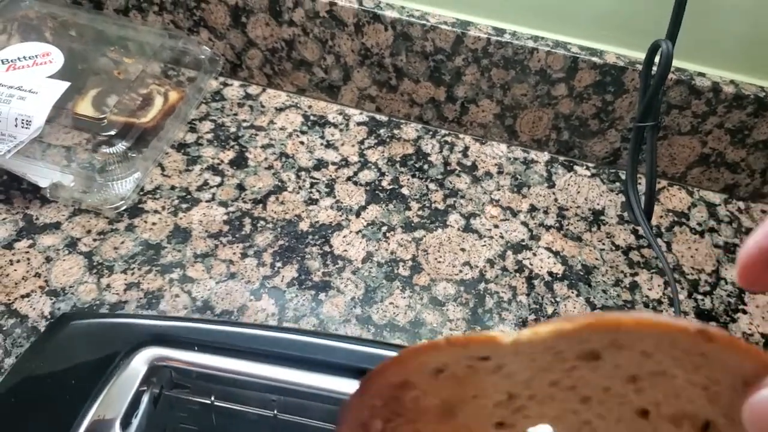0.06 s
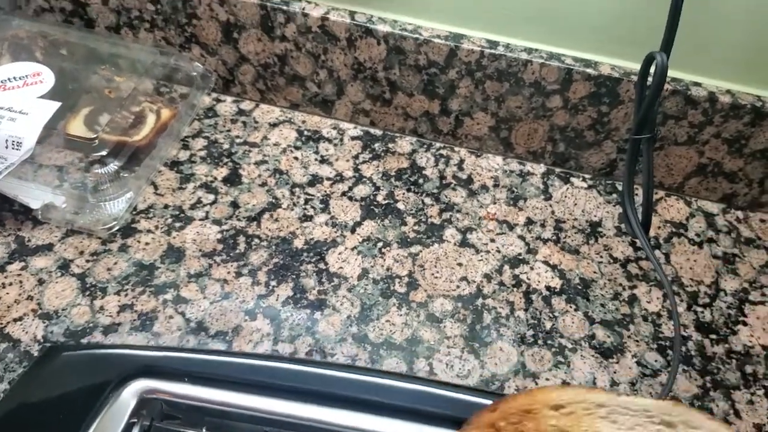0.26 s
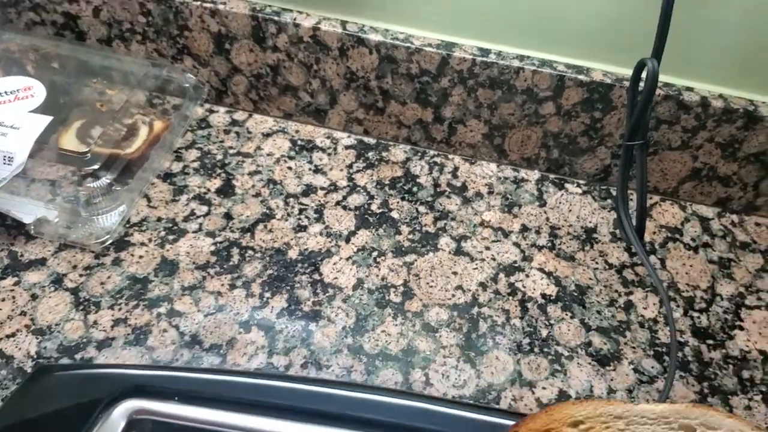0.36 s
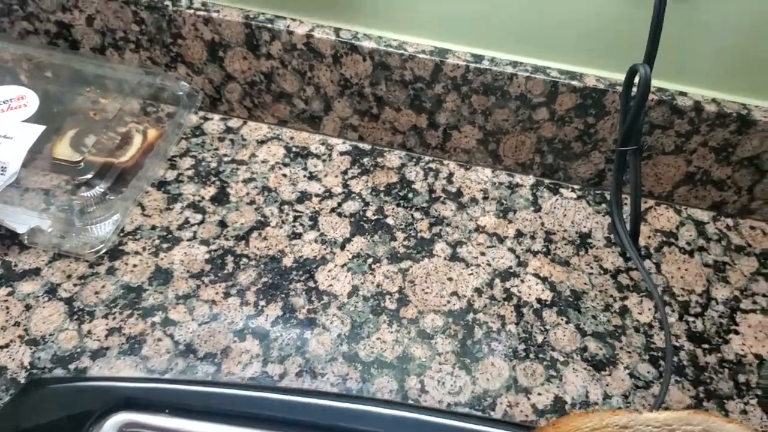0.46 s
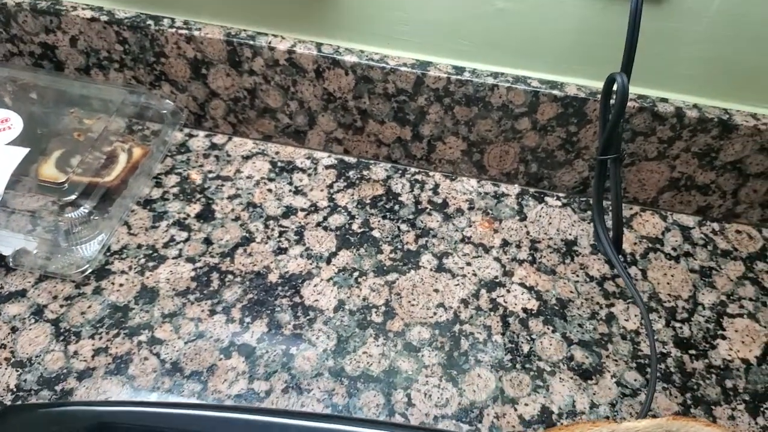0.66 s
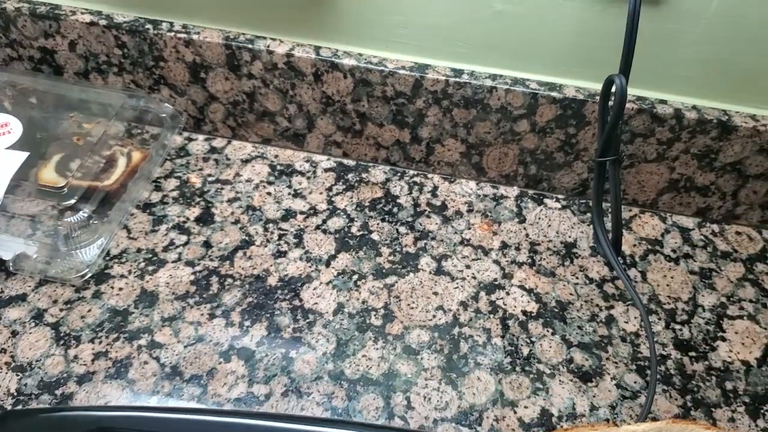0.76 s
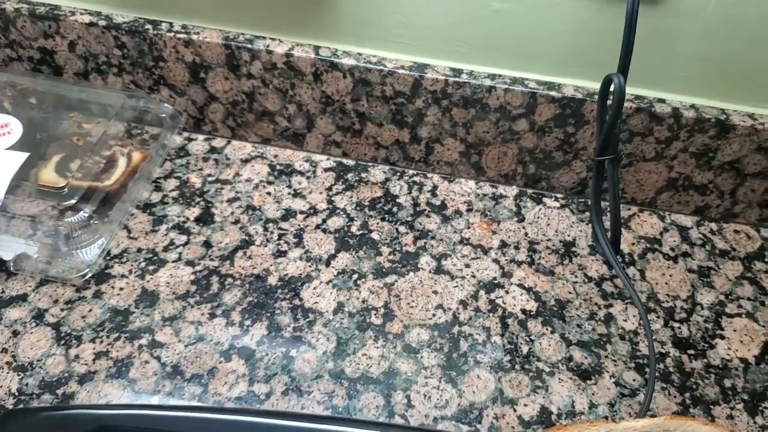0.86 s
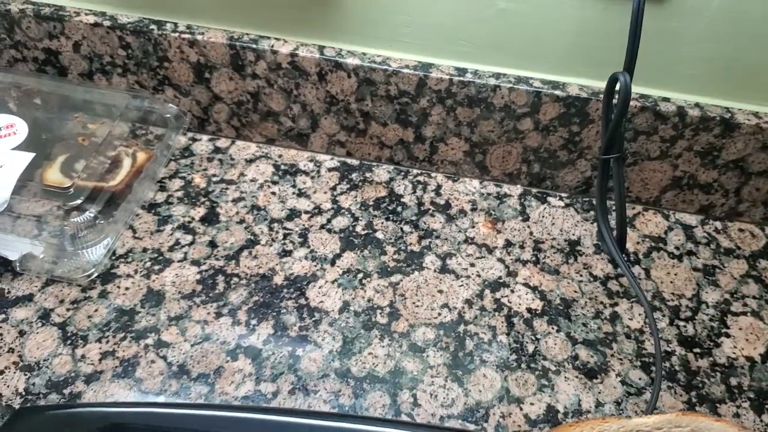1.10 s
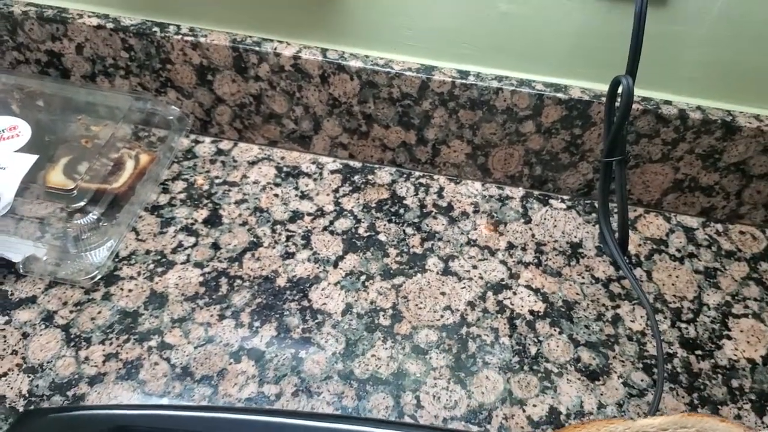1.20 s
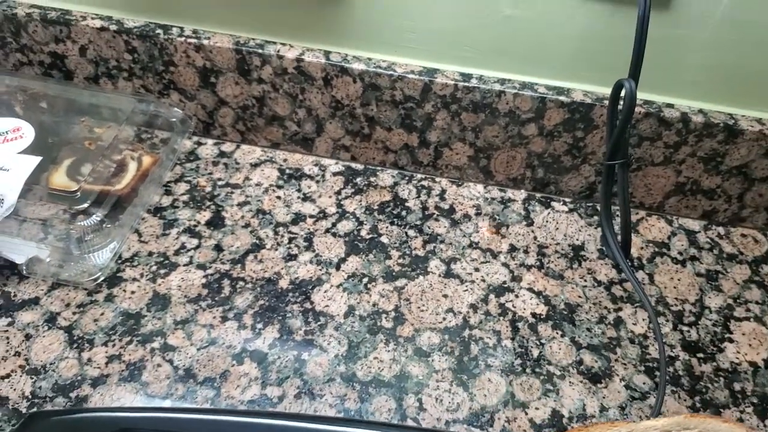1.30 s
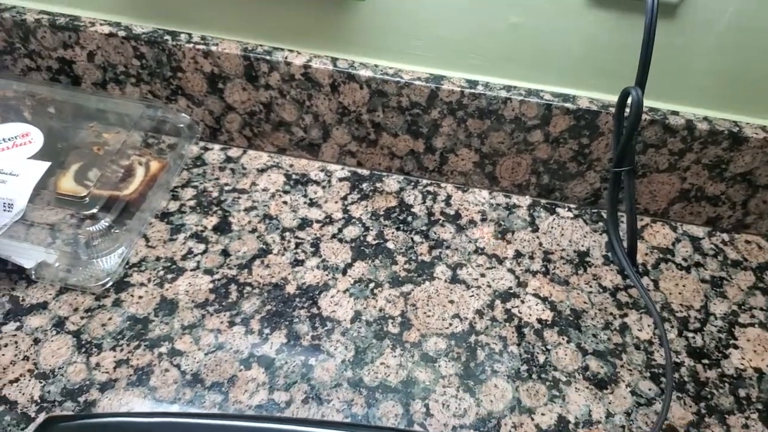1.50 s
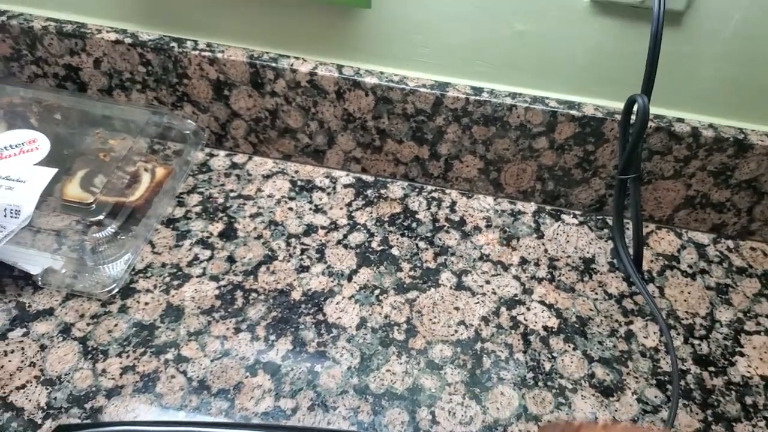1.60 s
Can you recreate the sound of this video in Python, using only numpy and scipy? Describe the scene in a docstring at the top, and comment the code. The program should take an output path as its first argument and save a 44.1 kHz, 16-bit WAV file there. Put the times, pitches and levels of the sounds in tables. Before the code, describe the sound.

On a kitchen counter, a toaster lever clunks down and rattles after a light scrape of bread. Small ticks follow as it settles, then a faint low hum and a few soft bumps near the microphone.

```python
"""A toaster on a stone kitchen counter: bread scrapes along its wire guards and the lever is pushed down.
The carriage knocks, hits its stop and rattles. Each impact excites damped normal modes, low in the case
and high in the guards, and the toaster rocks on its rubber feet. The spring and catch tick as they settle.
After a pause with a low hum come soft handling bumps close to the microphone."""
import sys
import numpy as np
from scipy import signal
from scipy.io import wavfile

SR = 44100
rng = np.random.default_rng(int(sys.argv[2]) if len(sys.argv) > 2 else 0)


def wav_out(sig):
    """Save sig, one row per channel (or a flat mono array), as 16-bit PCM at SR to the path in sys.argv[1]."""
    wavfile.write(sys.argv[1], SR, np.round(np.clip(np.atleast_2d(sig).T, -1, 1) * 32767).astype(np.int16))


N = 72765
TIME = np.arange(N) / SR
EDGES_HZ = 31.25 * 2 ** (np.arange(28) / 3)  # third-octave bands
CENTRES_HZ = np.sqrt(EDGES_HZ[1:] * EDGES_HZ[:-1])


def from_db(db):
    """Amplitude grows tenfold every 20 dB."""
    return 10 ** (np.asarray(db) / 20)


def rms_one(x):
    """Normalisation to unit mean power."""
    return x / np.sqrt(np.mean(x ** 2) + 1e-20)


def by_band(points):
    """Interpolation over log frequency, read at the band centres."""
    hz, value = np.transpose(points)
    return np.interp(np.log(CENTRES_HZ), np.log(hz), value)


def colour(spectrum):
    """Band power is spectral density times bandwidth; the gains have unit total power."""
    gain = from_db(by_band(spectrum)) * np.sqrt(np.diff(EDGES_HZ))
    return gain / np.linalg.norm(gain)


def noise_bands():
    """Partial coherence: bands of stereo noise, more alike in the bass than in the treble."""
    # likeness of left and right: frequency_hz, correlation
    coherence = [(60, 0.571), (300, 0.69), (700, 0.43), (1500, 0.2904), (14000, 0.43)]
    white, bands = rng.standard_normal((2, 2, N)), []
    for k, alike in enumerate(np.clip(by_band(coherence), 0, 1)):
        bandpass = signal.butter(2, EDGES_HZ[k:k + 2], "band", fs=SR, output="sos")
        mid, side = signal.sosfilt(bandpass, white[k % 2])
        bands.append(rms_one(np.sqrt(1 + alike) * mid + np.sqrt(1 - alike) * side * [[1], [-1]]))
    return np.array(bands)


def response(crack_t60_s, room_db, snap_db, snap_t60_s=0.00406):
    """Impulse response of a contact by band: a snap, a crack of dense modes and reverberation."""
    # reverberation time of the kitchen: frequency_hz, t60_s
    room_decay = [(60, 1), (300, 0.77), (1000, 0.45), (3000, 0.535), (8000, 0.4345), (15000, 0.392)]
    tail = from_db(room_db - 60 * TIME / by_band(room_decay)[:, None])
    direct = np.hypot(from_db(snap_db - 60 * TIME / snap_t60_s), from_db(-60 * TIME / crack_t60_s))
    return noise_bands() * np.hypot(direct, tail)[:, None]


def mix(gains, bands):
    """Weighted superposition of bands."""
    return np.tensordot(gains, bands, 1)


def at(start_s, x):
    """A pure delay in whole samples."""
    return np.pad(x, ((0, 0), (int(start_s * SR), 0)))[:, :N]


def strikes(rows, spectrum, bands):
    """Impacts share an impulse response, each with its own strength and spectral tilt."""
    octaves = np.log2(CENTRES_HZ / 2500)
    return sum(at(s, mix(colour(spectrum) * from_db(db + tilt * octaves), bands)) for s, db, tilt in rows)


def ring(force, hz, t60_s):
    """A damped oscillator: a unit impulse starts a decaying sine of height 1."""
    radius, angle = np.exp(-np.log(1000) / (t60_s * SR)), 2 * np.pi * hz / SR
    return signal.lfilter([0, np.sin(angle)], [1, -2 * radius * np.cos(angle), radius ** 2], force + 1e-18)


def modes(start_s, level_db, table, spread_db=2.5):
    """Modal superposition: every blow excites every mode with a slightly different strength."""
    sound = 0
    for k, (hz, db, t60_s) in enumerate(table):
        scatter_db = spread_db * rng.standard_normal(len(start_s))
        force = np.zeros(N)
        force[(start_s * SR).astype(int)] = from_db(level_db + db + scatter_db)
        sound = sound + (-1) ** k * ring(force, hz, t60_s)
    return sound


def resonate(x, table):
    """Resonance lifts narrow bands: band-passed copies add to the sound."""
    return x + sum(from_db(db) * signal.lfilter(*signal.iirpeak(hz, hz / width_hz, fs=SR), x)
                   for hz, width_hz, db in table)


def grains(per_s, spread_db):
    """A Poisson train of impulses of uneven size and sign."""
    hits = rng.random(N) < per_s / SR
    sizes = from_db(spread_db * np.clip(rng.standard_normal(N), -2, 2))
    return hits * sizes * rng.choice([-1, 1], N)


def envelope(curve):
    """Amplitude envelope along a level curve, silent before it and from 20 ms after it."""
    time_s, db = np.transpose(curve)
    return from_db(np.interp(TIME, time_s, db)) * (TIME >= time_s[0]) * (TIME <= time_s[-1] + .02)


def background():
    """Narrow-band noise wavers in amplitude: a low room hum over faint hiss."""
    # partials of the hum: pitch_hz, level_db, width_hz
    partials = [(57.4, -76.5, 3.3), (104.6, -69.5, 7), (237.3, -88, 7.205), (431.94, -88, 8.7),
                (1385, -101, 9.5)]
    # swell of the hum: time_s, gain_db
    swell = [(0, 0.5), (.5, -28), (.7, 1.5), (.85, 2), (.94, -5), (1.02, 4), (1.09, -1.5), (1.16, -1.5),
             (1.24, -10.5), (1.65, 6)]
    # spectrum of the hiss: frequency_hz, density_db
    hiss = [(30, -11), (60, -4.5), (105, -6.5), (150, -18), (250, -17.5), (400, -20.5), (600, -28.5),
            (1300, -27.5), (2500, -30), (5000, -33), (8000, -45), (11000, -34.5), (15500, -34)]
    hum = 0
    for hz, db, width_hz in partials:
        tone = ring(rng.standard_normal(2 * N), hz, t60_s=np.log(1000) / (np.pi * width_hz))
        hum = hum + from_db(db) * rms_one(tone[N:])  # steady state only
    return envelope(swell) * hum + from_db(-73.5) * mix(colour(hiss), noise_bands())


def bread():
    """Sliding friction: crust grains scratch the wire guards, make them sing and squeak briefly."""
    # strength of the scrape: time_s, level_db
    scrape = [(0, -51.5), (.03, -59), (.075, -65), (.1, -65), (.125, -67), (.145, -65.5), (.19, -73),
              (.25, -55.5)]
    # spectrum of a crust grain: frequency_hz, density_db
    crust = [(35, -9.5), (60, 20.5), (130, 3), (300, 4.5), (450, 8), (650, -6), (1200, -1.5), (1600, -2),
             (2500, 0.5), (4200, -1), (5600, -11.5), (7300, -7.5), (8300, -7.5), (14000, -15)]
    # crust slipping on a wire: centre_s, level_db
    slips = [(0.018, -69), (0.101, -68), (0.145, -66.5)]
    grain = mix(colour(crust), response(crack_t60_s=0.01264, room_db=-13.5, snap_db=0.5))
    scratch = signal.fftconvolve(grains(per_s=2500, spread_db=6.5)[None], grain, axes=1)[:, :N]
    guards_hz, slip_half_s = [1154, 2014.5, 2385, 2883, 3303, 3710], 0.0102
    wires = np.array([sum(ring(grains(per_s=1500, spread_db=2), hz, t60_s=0.0867) for hz in guards_hz)
                      for _ in range(2)])
    slipping = sum(from_db(db) * np.exp(-((TIME - s) / slip_half_s) ** 2) for s, db in slips)
    squeaks = slipping * rms_one(ring(rng.standard_normal((2, N)), hz=7249, t60_s=0.0296))
    return envelope(scrape) * (rms_one(scratch) + from_db(-5.5) * rms_one(wires)) + squeaks


def lever():
    """Impact excitation: the carriage clacks and rattles, ringing the metal and the case."""
    # knocks of the carriage: start_s, boom_db, clack_db, tilt_db_per_octave, panel_hz
    knocks = [(0.1934, -48.5, -57, 2.5, 352.5), (0.2032, -39.5, -58.5, 0.5, 353.3),
              (0.217, -50, -54, -4, 324), (0.2483, -36.5, -28.5, -1, 260.2),
              (0.2615, -46, -43.5, -1.5, 284), (0.2878, -32.5, -38, 1, 475), (0.3118, -47, -50, 7, 345),
              (0.3413, -34.5, -37.5, 2.5, 434.6), (0.3556, -45, -43, 0.5, 313),
              (0.389, -39.5, -60.5, -6.5, 340), (0.42, -50.5, -78.5, -9.5, 414.4),
              (0.461, -57.5, -63.5, -1, 405), (0.531, -56, -57.5, -0.5, 403.8)]
    # spectrum of a clack: frequency_hz, density_db
    clack = [(40, -18.5), (75, 2.5), (130, -21.5), (190, -2.5), (450, 3.5), (570, -8.5), (800, -3),
             (1400, -0.5), (2800, -4), (4400, -6.5), (6200, -15.5), (10000, -15), (15500, -18)]
    # modes of the wire guards and sheet metal: pitch_hz, gain_db, t60_s
    metal_modes = [(703.4, 2, 0.19), (788.9, 3.5, 0.19), (870.1, 0, 0.21), (1152, -8.5, 0.83),
                   (1218, -4.5, 0.422), (1315, 7.5, 0.121), (1519.4, -16, 0.807), (1912.6, -2.5, 0.384),
                   (2213, -14, 0.85), (2420, -1, 0.23), (3416, -9.5, .33), (3806, -13.5, 1),
                   (4068, -1, 0.11), (5245, -4, 0.2)]
    # resonances of the carriage: centre_hz, width_hz, gain_db
    carriage = [(784.6, 99, 2), (1281.7, 28, 2.5), (4210, 250, -7.5), (5041, 120, -4), (13760, 860, -8)]
    start_s, boom_db, clack_db, tilt, panel_hz = np.transpose(knocks)
    blows = list(zip(start_s, clack_db, tilt))
    clacks = sum(strikes(blows[k::2], clack, response(crack_t60_s=0.0652, room_db=-8.5, snap_db=-3))
                 for k in range(2))  # two noise draws lower the stereo coherence
    metal = np.array([modes(start_s + rng.uniform(0, .001, len(start_s)), clack_db - 14, metal_modes)
                      for _ in range(2)])
    return resonate(clacks + rattle(clack), carriage) + metal + case(start_s, boom_db, panel_hz)


def case(start_s, boom_db, panel_hz, panel_boost_db=9.5, width_octaves=0.218):
    """Modal coupling: a knock booms in the whole case, most near the pitch of the panel it strikes."""
    # modes of the case on its feet: pitch_hz, gain_db, t60_s
    case_modes = [(85.93, -17, 0.565), (103.4, -8, 0.52), (115.5, 2, 0.326), (150.78, -13, 0.257),
                  (226.76, -18, .22), (277.57, -15.5, .33), (302.64, -15.5, 0.466), (349.77, -10, 0.221),
                  (382.4, -19, 0.17), (438.1, -10, 0.259), (479.43, -11.5, 0.1814)]
    boom = 0
    for k, (hz, db, t60_s) in enumerate(case_modes):
        coupling = np.exp(-(np.log2(hz / panel_hz) / width_octaves) ** 2)
        boom = boom + (-1) ** k * modes(start_s, boom_db + panel_boost_db * coupling, [(hz, db, t60_s)])
    return boom


def rocking():
    """A mass on a spring: each jolt sets the toaster swaying on its rubber feet."""
    # jolts to the toaster: start_s, level_db
    jolts = [(0.2033, -45.5), (0.2576, -38.5), (0.2941, -41.5)]
    start_s, db = np.transpose(jolts)
    force = np.zeros(N)
    force[(start_s * SR).astype(int)] = from_db(db)
    return ring(force, hz=57.18, t60_s=0.755)


def rattle(spectrum, start_s=.25, end_s=0.41, fall_db_per_s=93):
    """Random collisions of loose parts die away exponentially."""
    fading = from_db(-36.5 - fall_db_per_s * (TIME - start_s)) * (TIME > start_s) * (TIME < end_s)
    clicks = [mix(colour(spectrum), response(crack_t60_s=0.034, room_db=-27, snap_db=-5.5))
              for _ in range(2)]
    return sum(signal.fftconvolve((fading * grains(per_s=85, spread_db=3))[None], click, axes=1)[:, :N]
               for click in clicks)


def catch():
    """Light impacts tick through the spring's resonances; the catch pings in free vibration."""
    # the spring and catch settling: start_s, level_db, tilt_db_per_octave
    contacts = [(0.4538, -64, 10.5), (0.4768, -55, 7), (0.507, -67.5, 10), (0.545, -64.5, -4),
                (0.7139, -52.5, 2.5), (0.7255, -59.5, 2)]
    # spectrum of a tick: frequency_hz, density_db
    tick = [(60, -6), (400, 16.5), (600, -28), (790, 29), (1050, -32), (2000, 4), (2900, 4), (3700, -3),
            (5800, -4), (9000, -12), (15500, -13)]
    # resonances of the spring: centre_hz, width_hz, gain_db
    spring = [(8670, 170, 1), (12160, 1140, 1.5)]
    # modes of the catch: pitch_hz, level_db, t60_s
    catch_modes = [(412, -66.5, 0.746), (761.1, -70.5, 0.185), (788.8, -67, 0.13), (2520, -73, .15),
                   (2842, -64, 0.1)]
    ticks = strikes(contacts, tick, response(crack_t60_s=0.078, room_db=-15, snap_db=-6))
    ping = modes(start_s=np.array([0.7145]), level_db=0, table=catch_modes)
    return resonate(ticks, spring) + ping


def bump_colour(centre_hz, rise_db_per_octave=3, fall_db_per_octave=17):
    """A soft contact acts as a low-pass filter, leaving only a faint edge far above its centre."""
    # spectrum common to the bumps: frequency_hz, density_db
    bump = [(40, -9.5), (150, -6), (190, -7.5), (260, 7), (440, 0), (560, -8), (720, -5.5), (1300, 1),
            (2500, 3), (6000, 1.5), (9000, -27), (15000, -5)]
    octaves = np.log2(CENTRES_HZ / centre_hz)
    slope_db = np.where(octaves > 0, -fall_db_per_octave, rise_db_per_octave) * octaves
    edge = from_db(-28.5) * (centre_hz / 1250) ** 2
    gain = colour(bump) * np.hypot(from_db(slope_db), edge)
    return gain / np.linalg.norm(gain)


def handling():
    """Soft impacts excite hollow resonances and low, thumping modes."""
    # handling bumps: start_s, level_db, centre_hz, thump_db
    contacts = [(1.288, -59.5, 546, -72.5), (1.318, -61.5, 514, -58), (1.3654, -55, 602, -57),
                (1.393, -61, 699, -60), (1.423, -59.5, 1105, -57.5), (1.4755, -53, 1157, -71.5),
                (1.502, -47, 1283, -53), (1.527, -58, 1665, -50.5), (1.551, -66.5, 1585, -57.5),
                (1.595, -53.5, 1157, -68.5), (1.609, -56.5, 987, -52.5)]
    # hollow resonances: centre_hz, width_hz, gain_db
    hollow = [(459, 133, -1.5), (703, 74, 6.5), (770, 67, -13)]
    # modes of the thump: pitch_hz, gain_db, t60_s
    thump_modes = [(62.3, -5.5, 0.45), (106.7, -1.5, 0.12), (160.8, -3, 0.152), (242.5, -10.5, 0.156),
                   (419.5, -15, 0.149)]
    bands = response(crack_t60_s=.065, room_db=-14, snap_db=-2)
    bumps = sum(at(s, mix(from_db(db) * bump_colour(hz), bands)) for s, db, hz, _ in contacts)
    start_s, _, _, thump_db = np.transpose(contacts)
    return resonate(bumps, hollow) + modes(start_s, thump_db, thump_modes)


def fingers():
    """Friction noise of lightly brushing fingers."""
    # strength of the rub: time_s, level_db
    rub = [(1.47, -80), (1.585, -77.5), (1.612, -65.5), (1.65, -76)]
    # spectrum of sliding skin: frequency_hz, density_db
    skin = [(200, -29), (2000, -6), (4000, 1.5), (7500, -6.5), (10000, -4.5), (15000, -11.5)]
    return envelope(rub) * mix(colour(skin), noise_bands())


def scene(left_lag_s=0.0001575):
    """The sources superpose and reach the right microphone slightly before the left."""
    both = lever() + rocking() + catch() + bread() + handling() + fingers() + background()
    return np.array([at(left_lag_s, both)[0], both[1]])


def record(dry):
    """Band limiting removes the deepest bass and the highest treble."""
    highpass = signal.butter(2, 35, "high", fs=SR, output="sos")
    lowpass = signal.ellip(10, .3, 70, 16100, fs=SR, output="sos")
    return signal.sosfilt(lowpass, signal.sosfilt(highpass, dry))


dry = scene()
out = record(dry)
wav_out(out)
```